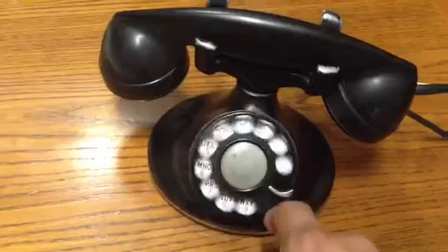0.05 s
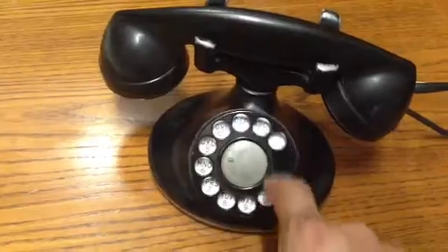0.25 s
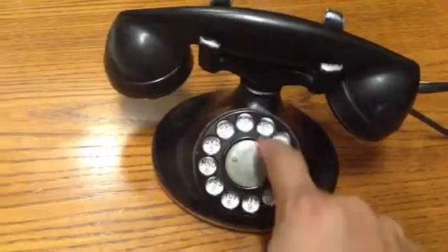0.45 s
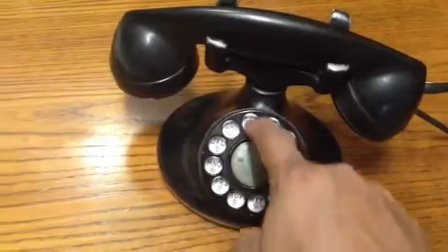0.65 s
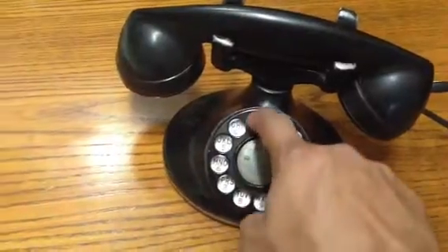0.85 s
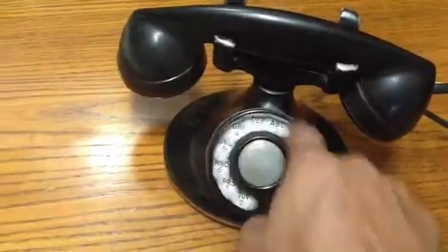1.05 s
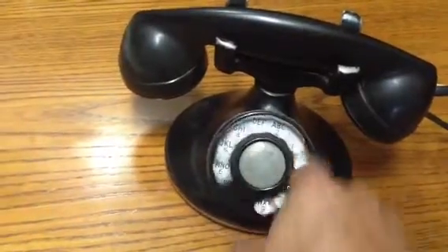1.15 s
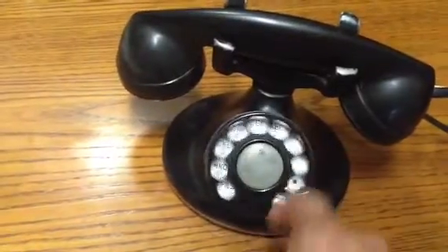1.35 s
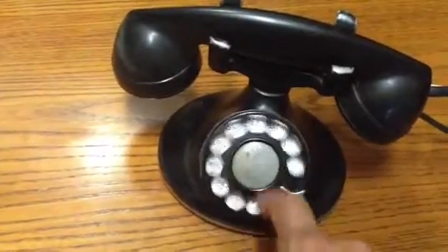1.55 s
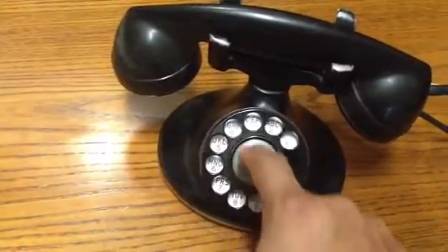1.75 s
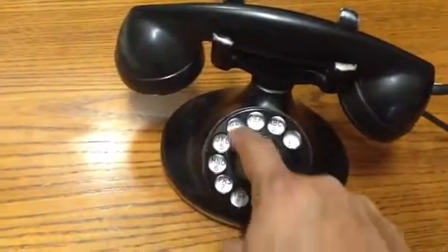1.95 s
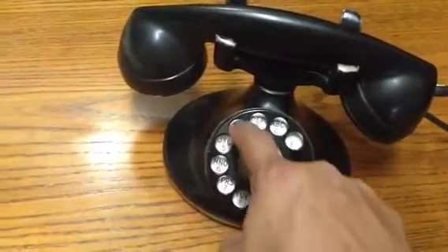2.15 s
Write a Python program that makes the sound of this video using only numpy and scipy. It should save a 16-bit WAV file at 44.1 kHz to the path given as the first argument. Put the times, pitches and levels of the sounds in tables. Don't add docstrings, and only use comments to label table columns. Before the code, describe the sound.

Rotary telephone dial, close up in a quiet room: the end of a whirring return and a sharp snap, a pause, a short rasping wind, a clack at the stop, then a ticking whirr back and another snap.

```python
import sys
import numpy as np
from scipy import signal
from scipy.fft import rfft, irfft
from scipy.io import wavfile
from scipy.ndimage import uniform_filter1d

SR = 44100
rng = np.random.default_rng(int(sys.argv[2]) if len(sys.argv) > 2 else 0)


def natural_amplitude(level_db):
    exponent = np.asarray(level_db, float) / 20
    return 10 ** exponent


def unload_wav(signal):
    wavfile.write(
        sys.argv[1],
        SR,
        np.round(np.clip(np.atleast_2d(signal).T, -1, 1) * 32767).astype(np.int16),
    )


N = 97020

# start in seconds, level in dB.
SNAPS = [
    (.2302, -16),
    (1.7357, -16.5),
]
# delay in seconds, level in dB, contact time in seconds.
SNAP_BOUNCES = [
    (0, -10.5, 0.00018),
    (.0011, -3.5, 0.00012),
    (.0019, -5.5, 0.000063),
    (.0027, -8.5, .00006),
    (.0037, -11, .00008),
    (.0053, -9, .00012),
]
# start in seconds, level in dB, rise in seconds, fall in seconds.
STOP_HITS = [
    (1.1974, -22.5, 0.002337, .002),
    (1.2077, -32.5, 0.0014, .0012),
    (1.2221, -51, .001, 0.0033),
    (1.2452, -42.5, .0004, 0.000584),
]
# first contact time in seconds, last contact time in seconds.
STOP_CONTACTS = [(0.000036, 0.00014), (0.000021, 0.000028), (.0001, 0.00024), (0.00036, .00013)]
# frequency in Hz, level in dB.
PLATE_MODES = [(1330, -12), (1710, -8.5), (2100, -11), (2450, -15), (3300, -7), (3700, -4.5), (4250, 0),
               (5000, -11), (5800, -2), (7000, -2), (8500, -10), (9600, -11.5), (11500, -13.5),
               (13500, -14)]
# start in seconds, level in dB, rattle rise and fall in seconds.
TICKS = [(0.024, -48.5, .005), (.046, -48, .005), (.073, -50, .005), (.184, -50, .005), (0.208, -49, .004),
         (0.3312, -43.5, .003), (.344, -48, .004), (0.36, -64, .004), (1.333, -44, .005),
         (1.354, -48, .004), (1.397, -47.5, .002), (1.445, -44.5, .006), (1.483, -48, .002),
         (1.557, -45, .007), (1.586, -48, .003), (1.8064, -44, .002), (1.814, -58, .001),
         (1.823, -54, .0012), (1.83, -63, .001)]
# start in seconds, level in dB, contact time in seconds.
KNOCKS = [
    (.232, -44.5, 0.0002),
    (.335, -82, 0.002),
    (1.199, -53.5, 0.0017),
    (1.2165, -45, 0.0015),
    (1.247, -53, 0.0002),
    (1.738, -49.5, 0.00039),
]
# frequency in Hz, level in dB, T60 in seconds.
TABLE_MODES = [(164, -20, 0.035), (262.4, -10, 0.19), (327.6, 0.5, 0.059), (405.7, 5, 0.032),
               (520, 0.5, 0.045), (641, -1, 0.034), (788, -1.5, 0.042), (1062, -5.5, 0.029)]
# time in seconds, level in dB.
WIND_EFFORT = [(.975, -97.5), (1.001, -56.5), (1.033, -47.5), (1.135, -45), (1.157, -39.5), (1.179, -38.5),
               (1.192, -40.5), (1.215, -34.5), (1.248, -92)]
# frequency in Hz, width in Hz, level in dB.
WIND_BODY = [(573, 364, -7.5), (1307, 280, -13.5), (2010, 150, -15.5), (3610, 370, -3), (4480, 466, -1),
             (6050, 894, 3), (6880, 590, -3.5), (9700, 1200, 1.5), (11100, 1300, -12), (14300, 580, -15)]
# start in seconds, end in seconds, level in dB, attack in seconds, release in seconds.
SPINS = [
    (-.05, 0.264, -56.5, 0.044, 0.03),
    (0.312, 0.366, -57.5, 0.018, 0.0099),
    (1.26, 1.823, -56.5, 0.092, 0.016),
]
# frequency in Hz, width in Hz, level in dB.
RETURN_BODY = [(1765, 260, 5.5), (2055, 430, 0), (3600, 280, 6), (4317, 350, 11.5), (5200, 970, -3),
               (6250, 700, 9.5), (7000, 1500, 5.5), (9600, 1290, 1.5), (11300, 1870, 2)]
# frequency in Hz, width in Hz, level in dB.
SHIVER_BODY = [(1730, 700, -7), (2700, 560, -5), (3833, 670, -0.5), (5530, 1400, -3.5), (6960, 1000, -5.5),
               (9500, 2500, -12)]
# frequency in Hz, density in dB per Hz.
AIR_SPECTRUM = [(25, -33.5), (100, -39.5), (150, 4.5), (330, 2.5), (600, -8.5), (2200, -8.5), (3000, -11.5),
                (15800, -16.5)]
# frequency in Hz, width in Hz, level in dB.
DRONES = [(67.5, 13, -85.5), (118.5, 6.6, -83.5), (167.6, 16, -90), (207.1, 5.7, -70.5), (296, 9.7, -69.5),
          (486, 13.5, -75), (538, 7.6, -76.5), (1418, 31, -80.5)]

PLATE_LOW_HZ, PLATE_T60_S, PLATE_T60_SLOPE = 1194, .009, -.7
SNAP_CHATTER_DB, TICK_CONTACT_S = -14, .00008
TEETH_PER_S, TEETH_SCATTER_DB, WHIRR_FLICKER_DB, BAND_FLICKER_DB = 9000, 2, 2.5, 1.5
DRAG_DB_PER_DB, DRAG_DB, DRAG_HZ = 1.4, 7, 1460
GOVERNOR_DB, GOVERNOR_HZ, GOVERNOR_DEPTH = -2, 36, 0.34
SHIVER_DB, SHIVER_DELAY_S, SHIVER_T60_S = -20.5, .003, 0.16
CASE_T60_S, CASE_DB = 0.093, -17
ROOM_T60_S, ROOM_DB, ECHO_TOP_HZ, ECHO_GAP_S = 0.26, -21, 7460, .004
AIR_DB = -64.5
MIC_LOW_HZ, MIC_TOP_HZ = 162, 15200


def level(x, db):
    return x * natural_amplitude(db) / np.sqrt(np.mean(x ** 2))


def high(x, hz):
    return signal.sosfilt(signal.butter(4, hz, "high", fs=SR, output="sos"), x)


def band(x, hz, width_hz):
    b, a = signal.iirpeak(hz, hz / max(width_hz, 1), fs=SR)
    return signal.lfilter(b, a, x)


def ring(force, modes):
    out = np.zeros(N)
    for hz, db, t60_s in modes:
        pole = np.exp(2j * np.pi * hz / SR - np.log(1000) / (t60_s * SR))
        out += natural_amplitude(db) * signal.lfilter([1], [1, -pole], force).imag
    return out


def walk(rate_hz):
    k = int(SR / rate_hz)
    held = np.repeat(rng.standard_normal(N // k + 1), k)
    return 0.98 * uniform_filter1d(uniform_filter1d(held, k), k)[:N]


def blows(rows, loose=False):
    force, n = np.zeros(N), np.arange(-64, 65)
    signs = rng.choice([-1, 1], size=len(rows)) if loose else np.ones(len(rows))
    for (start_s, db, contact_s), sign in zip(rows, signs):
        at = start_s * SR
        width = max(contact_s * SR / 3, .45)
        u = (n - at % 1) / width
        force[int(at) + n] -= sign * natural_amplitude(db) * u * np.exp(-.5 * u ** 2) / width
    return force


def chatter(start_s, db, rise_s, fall_s, first_s, last_s, count=16):
    r = rng.random((count, 2))
    at = (np.arange(count) + r[:, 0] - r[0, 0]) / count
    delay_s = at * (rise_s + 2 * fall_s)
    rising = .35 + 0.7 * delay_s / rise_s
    falling = np.exp(-(delay_s - rise_s) / fall_s)
    gain = np.where(delay_s < rise_s, rising, falling) * (0.38 * r[:, 1] + 0.34)
    contact_s = first_s * (last_s / first_s) ** np.sin(np.pi / 2 * np.minimum(at * 1.96, 1))
    return list(zip(start_s + delay_s, db + 20 * np.log10(gain), contact_s))


def teeth():
    hit = rng.random(N) < TEETH_PER_S / SR
    size = natural_amplitude(TEETH_SCATTER_DB * rng.exponential(size=N)) * rng.standard_normal(N)
    return hit * size * natural_amplitude(WHIRR_FLICKER_DB * walk(60.44))


def gears(body):
    shared = teeth()
    total = np.zeros(N)
    for hz, width_hz, db in body:
        contacts = teeth() + 0.88 * shared
        scrape = band(band(contacts, hz, 1.95 * width_hz), hz, 1.95 * width_hz)
        total += level(scrape * natural_amplitude(BAND_FLICKER_DB * walk(25)), db)
    return level(total, 0)


def plate(force):
    modes = [(hz, db, PLATE_T60_S * (hz / 3700) ** PLATE_T60_SLOPE) for hz, db in PLATE_MODES]
    return high(high(ring(force, modes), PLATE_LOW_HZ), PLATE_LOW_HZ)


def spring_snaps():
    bounces, loose = [], []
    for start_s, db in SNAPS:
        bounces += [(start_s + delay_s, db + rel_db, c) for delay_s, rel_db, c in SNAP_BOUNCES]
        loose += chatter(start_s, db + SNAP_CHATTER_DB, .0024, .002, 0.00034, .00006)
    return plate(blows(bounces) + blows(loose, loose=True))


def stop_hits():
    rows = []
    for hit, contacts_s in zip(STOP_HITS, STOP_CONTACTS):
        rows += chatter(*hit, *contacts_s, count=24)
    return plate(blows(rows, loose=True))


def winding(t):
    time_s, db = np.array(WIND_EFFORT).T
    effort_db = np.interp(t, time_s, db, left=-120, right=-120)
    rasp = gears(WIND_BODY)
    drag = level(band(teeth(), DRAG_HZ, 530), DRAG_DB)
    return rasp * natural_amplitude(effort_db) + drag * natural_amplitude(DRAG_DB_PER_DB * effort_db)


def returning(t):
    env = np.zeros(N)
    for start_s, end_s, db, attack_s, release_s in SPINS:
        attack = np.clip((t - start_s) / attack_s, 0, 1)
        env += natural_amplitude(db) * attack * np.exp(-np.maximum(t - end_s, 0) / release_s)
    phase = 2 * np.pi * np.cumsum(GOVERNOR_HZ * (1 + 0.027 * walk(11))) / SR
    turn = 1 + GOVERNOR_DEPTH * np.sin(phase)
    rumble = level(ring(teeth() * turn, TABLE_MODES), GOVERNOR_DB)
    return env * (gears(RETURN_BODY) + rumble)


def cam_ticks():
    rows = []
    for start_s, db, rattle_s in TICKS:
        rows += chatter(start_s, db, rattle_s, rattle_s, TICK_CONTACT_S, TICK_CONTACT_S, count=24)
    force = blows(rows, loose=True)
    return sum(natural_amplitude(db) * band(force, hz, w) * np.sqrt(4000 / w) for hz, w, db in RETURN_BODY)


def table_knocks():
    return ring(blows(KNOCKS), TABLE_MODES)


def shiver(t):
    env = np.zeros(N)
    for start_s, db in SNAPS:
        onset = np.clip((t - start_s) / SHIVER_DELAY_S, 0, 1) ** 2
        env += onset * natural_amplitude(db + SHIVER_DB - 60 * np.maximum(t - start_s, 0) / SHIVER_T60_S)
    return env * gears(SHIVER_BODY)


def tail(t60_s, db):
    lag_s = np.arange(SR // 2) / SR
    echo = rng.standard_normal(len(lag_s)) * natural_amplitude(-60 * lag_s / t60_s) * (lag_s > ECHO_GAP_S)
    echo = signal.lfilter(*signal.butter(1, ECHO_TOP_HZ, fs=SR), echo)
    return echo * natural_amplitude(db) / np.sqrt(np.sum(echo ** 2))


def echoes(dial):
    response = tail(ROOM_T60_S, ROOM_DB) + tail(CASE_T60_S, CASE_DB)
    return signal.fftconvolve(dial, response)[:N]


def background():
    hz, db = np.array(AIR_SPECTRUM).T
    f = np.maximum(np.arange(N // 2 + 1) * SR / N, 1)
    gain = natural_amplitude(np.interp(np.log(f), np.log(hz), db))
    out = level(irfft(rfft(rng.standard_normal(N)) * gain, N), AIR_DB)
    for drone_hz, width_hz, drone_db in DRONES:
        hum = band(band(rng.standard_normal(N), drone_hz, width_hz), drone_hz, width_hz)
        out += level(hum, drone_db)
    return out


def scene():
    t = np.arange(N) / SR
    dial = spring_snaps() + stop_hits() + winding(t) + returning(t)
    dial += cam_ticks() + table_knocks() + shiver(t)
    dial = high(dial, MIC_LOW_HZ)
    return (dial + echoes(dial) + background())[None]


def low_pass(x):
    return signal.sosfilt(signal.butter(12, 15990, fs=SR, output="sos"), x)


def record(dry):
    cut = signal.sosfilt(signal.ellip(8, .2, 60, MIC_TOP_HZ, fs=SR, output="sos"), dry)
    return low_pass(cut)


dry = scene()
out = record(dry)
unload_wav(out)
```